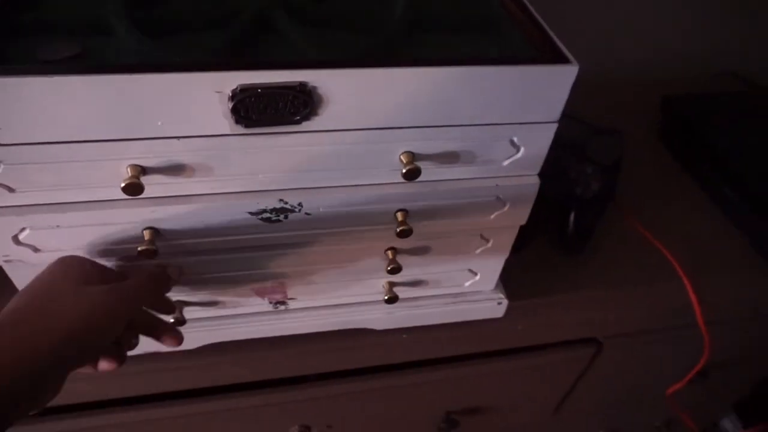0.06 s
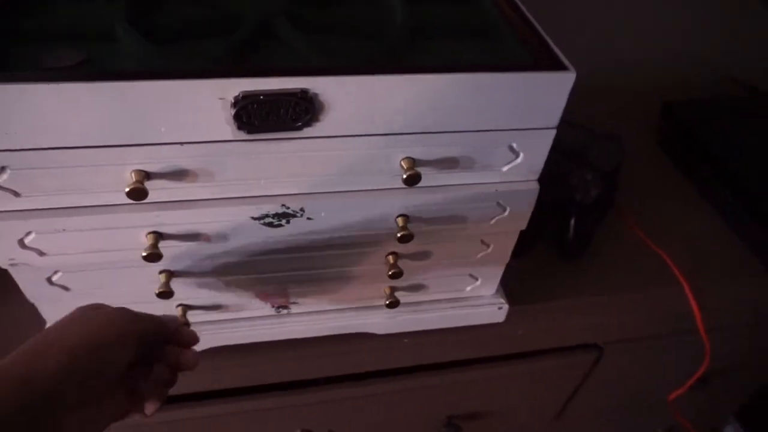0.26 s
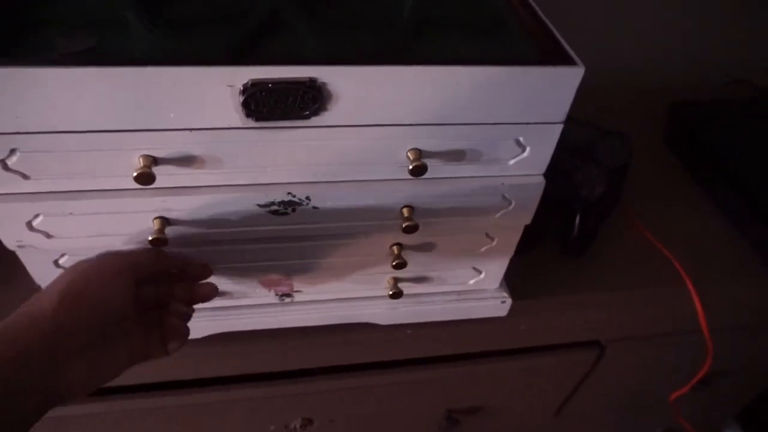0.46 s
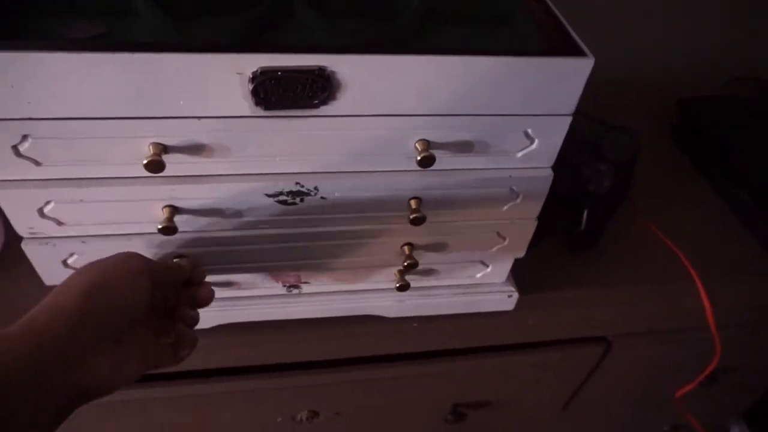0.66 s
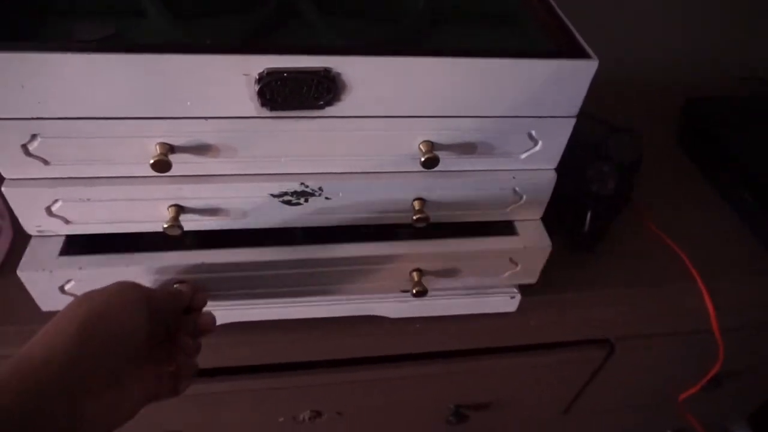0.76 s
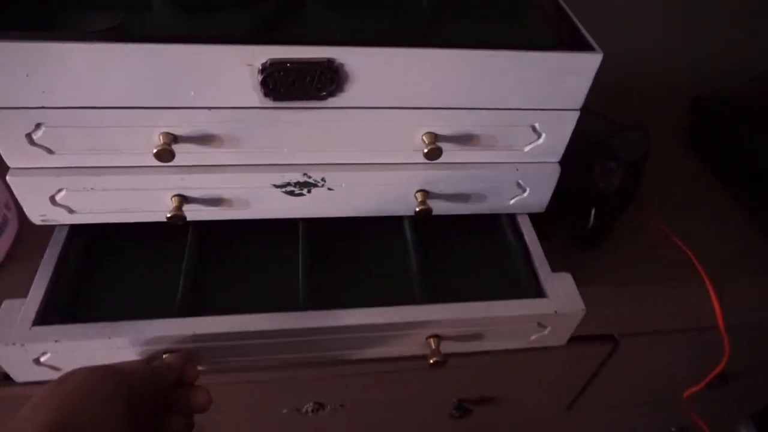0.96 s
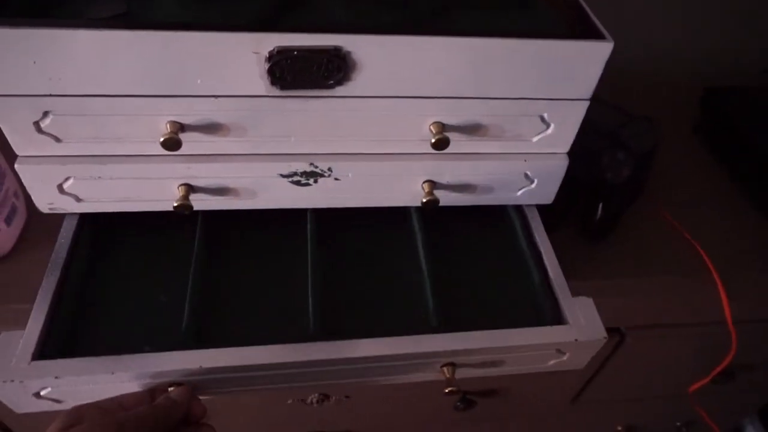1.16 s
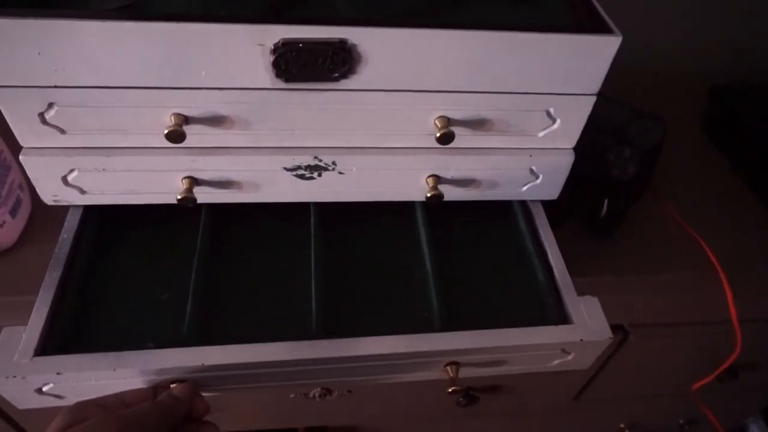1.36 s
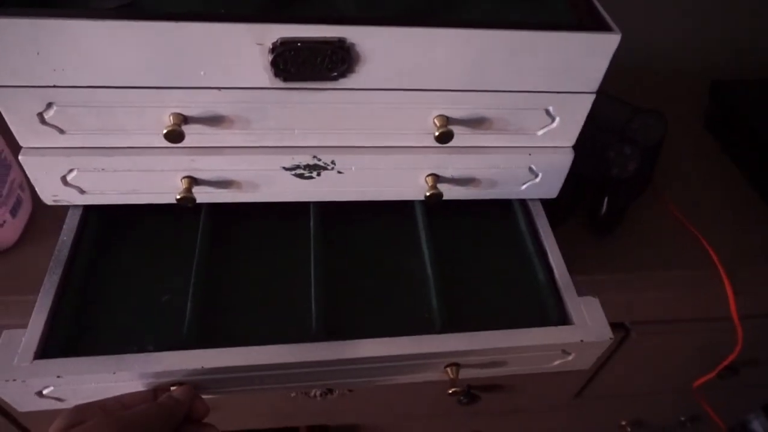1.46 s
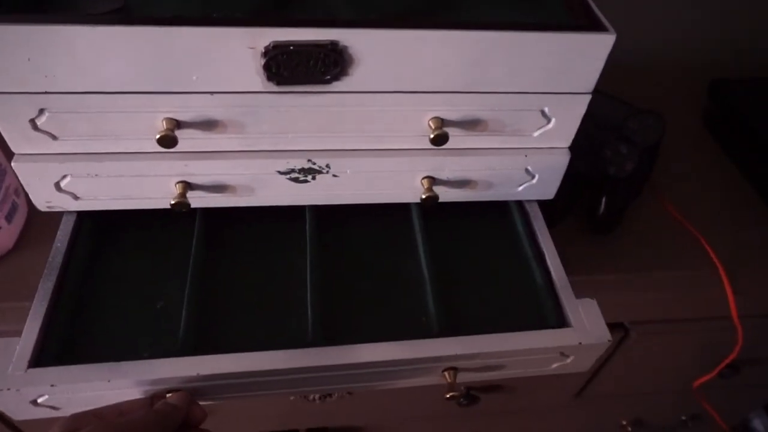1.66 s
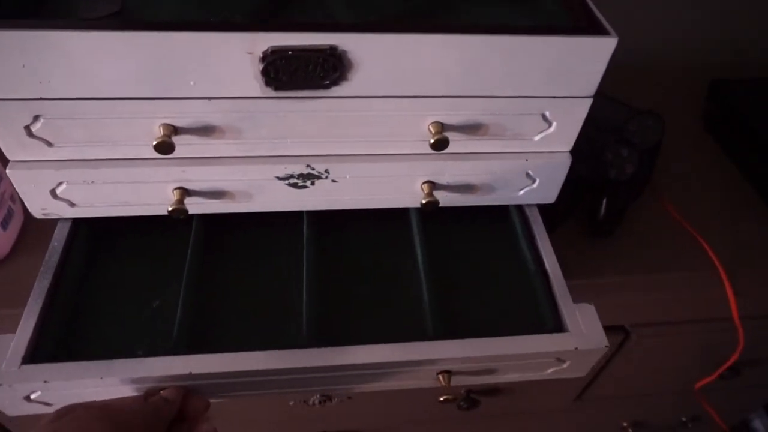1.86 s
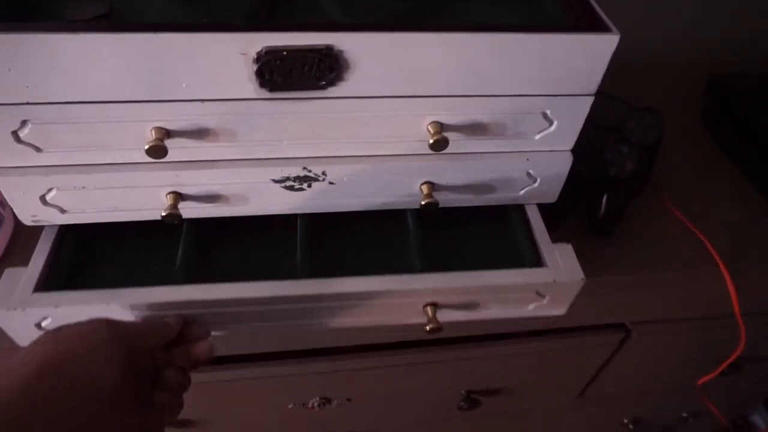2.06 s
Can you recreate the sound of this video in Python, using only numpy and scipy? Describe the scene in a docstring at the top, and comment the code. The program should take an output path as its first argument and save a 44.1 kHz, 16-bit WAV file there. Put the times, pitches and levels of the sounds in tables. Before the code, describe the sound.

A small wooden drawer, close up in a quiet, lightly echoing room. Soft bumps start it, with a quick cluster of hollow knocks around 0.25 s. A brass knob clicks at 0.56 s. A dry, grainy slide swells from 0.8 s to a strong woody knock at 0.97 s. A brief creaking catch follows near 1.18 s, then faint rubbing, near-quiet, and clacking knocks with a short scrape at 2.0-2.1 s.

```python
"""A drawer in a small wooden jewellery chest, in a quiet room. A hand bumps it home, rattles a brass
knob, pulls a drawer out and starts to push it back. Knocks and knob clicks are fading tones plus short
bursts of noise. Sliding is noise made of tiny slips, and brief catches are buzzing tones mixed with noise.
The room answers with a short tail, over faint room noise and a thin electrical whine."""
import sys
import numpy as np
from scipy import signal
from scipy.fft import rfft, irfft, next_fast_len
from scipy.io import wavfile
from scipy.ndimage import map_coordinates

SR = 44100
rng = np.random.default_rng(int(sys.argv[2]) if len(sys.argv) > 2 else 0)


def wrap_up_sound(samples):
    """Save the sound to the file named by the first command line argument, as 16-bit audio."""
    columns = np.atleast_2d(samples).T
    # keep every value between -1 and 1, then stretch to whole-number steps
    tamed = np.clip(columns, -1, 1)
    steps = np.round(tamed * 32767).astype(np.int16)
    wavfile.write(sys.argv[1], SR, steps)


N = 93227
T = np.arange(N) / SR  # time of every sample, in seconds

# All levels are relative: later gains and the sound's own colour also count.
# A t60 is the time a sound takes to fade by 60 dB.

# The drawer knocking in the case: (time [s], hollow thump level [dB], thump tilt [dB per octave],
# panel clack level [dB], contact brightness [Hz])
KNOCKS = [(.052, -31, -13, -32, 900), (0.06, -26.5, -11, -38, 890), (0.213, -33.5, -3, -31.5, 900),
          (0.2362, -24.5, 4, -20, 3960), (.246, -19.5, 10, -32, 2400), (.254, -18, 7, -31.5, 2000),
          (0.268, -23, -2, -27.5, 2400), (.767, -21, -8, -27.5, 1190), (.970, -9.5, 2, -23.5, 1200),
          (1.152, -26, 15, -56, 990), (1.259, -26.5, 4, -34.5, 900), (1.424, -33, 7, -52, 984),
          (1.968, -30, 2, -33, 900), (2.026, -24.5, -2, -16, 1550), (2.058, -15.5, -7, -20.5, 800),
          (2.096, -32, 5, -18, 1760)]
# Hollow ringing tones of the case: (pitch [Hz], level [dB], t60 [s])
CASE_MODES = [(179.2, -12.5, 0.16), (218.5, -7, 0.04), (341.8, 4.5, 0.047), (520, -8, 0.05)]
# Ringing tones of the panels: (pitch [Hz], level [dB], t60 [s])
PANEL_MODES = [(639, -4.5, 0.094), (765, 2, 0.019), (877, 1, 0.028), (1126, -8, 0.083), (1375, -1, 0.071),
               (1459, 6.5, 0.009), (1800, -9.5, 0.019), (2310, -7, 0.045)]
# Colour of the crack as wood meets wood: (pitch [Hz], level [dB])
CRACK_COLOUR = [(100, -65), (500, 3.5), (2300, 9.5), (3100, 4.5), (3700, -5.5), (8000, -10.5), (16000, -22)]
CRACK_DB, CRACK_T60_S = -4, 0.044
THUMP_RISE_S = 0.0026  # the case takes a moment to swing
THUMP_PIVOT_HZ = 313  # the tilt turns about this pitch

# The knob rattling on the drawer front: (time [s], click level [dB], thump level [dB])
KNOB_CLICKS = [(.550, -37.5, -65), (.560, -19, -26), (.567, -25.5, -27), (.583, -27, -25)]
# Ringing tones of the knob: (pitch [Hz], level [dB], t60 [s])
KNOB_MODES = [(1410, -4.5, 0.052), (1764, -4, 0.092)]
# Colour of the snap in each click: (pitch [Hz], level [dB])
SNAP_COLOUR = [(200, -10), (700, -1.5), (2900, 4), (3600, -8), (6300, -2.5), (7500, -21.5), (10000, -9),
               (16000, -40)]
SNAP_DB, SNAP_T60_S, KNOB_DB = 0.5, 0.033, -0.5
KNOB_TILT_DB = 7.5  # per octave: the knob's sharp clicks favour the upper case modes

# The drawer sliding: (time [s], hollow rumble level [dB], rasp level [dB], treble hiss level [dB])
SLIDE_LEVELS = [(0, -49, -55.5, -97), (.15, -46, -63.5, -74), (.39, -53.5, -57, -64.5),
                (.54, -55, -68, -78), (0.709, -49, -51, -60), (0.862, -35.5, -33, -41.5),
                (0.943, -35, -30, -41), (1.01, -43.5, -38, -46), (1.098, -48, -44.5, -50),
                (1.23, -37, -38.5, -54.5), (1.32, -52.5, -54, -63), (1.50, -47, -52.5, -71),
                (1.64, -63, -81, -81), (1.88, -68, -67, -92), (1.98, -42, -53, -59.5),
                (2.02, -46, -42, -50), (2.068, -32.5, -37, -45), (2.084, -29.5, -32, -44)]
# Colour of the hollow rumble: (pitch [Hz], level [dB])
RUMBLE_COLOUR = [(135, -25.5), (170, -9.5), (225, -4.5), (268, -8), (320, -0.5), (375, -0.5), (470, -9),
                 (600, -7.5), (1500, -43)]
# Colour of the wooden rasp: (pitch [Hz], level [dB])
RASP_COLOUR = [(200, -68), (630, -3.5), (790, 2.5), (1100, -3.5), (1400, 3), (1620, -7), (2000, -1.5),
               (2350, -8.5), (3900, -15.5), (8000, -33.5)]
# Colour of the treble hiss: (pitch [Hz], level [dB])
HISS_COLOUR = [(1500, -12), (3700, 2), (5600, -3), (7200, -8), (11000, -11), (16000, -30)]
# Colour of the runner's thin rub: (pitch [Hz], level [dB])
RUNNER_COLOUR = [(1300, -11), (2000, 2), (2330, -12), (2600, 6), (2950, -6.5), (6000, -33)]
# Loudness of the runner's thin rub: (time [s], level [dB])
RUNNER_LEVELS = [(.2, -72), (.45, -56.5), (.6, -79), (1.07, -42), (1.27, -48), (1.48, -46.5), (1.64, -79),
                 (1.72, -59.5), (1.82, -89)]
GRAINS_PER_S, GRAIN_SPREAD_DB = 1200, 1.45  # average number of slips, and how their sizes vary
GRAIN_SHARE = 0.45  # part of the rub's power that comes from slips
UNEVEN_DB = 1.6  # how much the grip wanders

# Dry spots on the runners: (time [s], half length [s], level [dB])
DRY_SPOTS = [(1.192, 0.059, -48.5), (2.095, 0.014, -35)]
# Colour of their sharp scrape: (pitch [Hz], level [dB])
DRY_COLOUR = [(2400, -35), (3000, -3), (4050, 2), (4500, -11), (5400, -4), (6500, -41)]

# The drawer catching and juddering: (time [s], length [s], level [dB], slip rate [Hz],
# roughness [noise amount against a tone of 1])
JUDDERS = [(1.181, 0.015, -19.5, 396, 0.36), (1.8784, 0.011, -42, 790, 0.77)]
# Colour of the judder's tone and noise: (pitch [Hz], level [dB])
JUDDER_COLOUR = [(200, -12), (390, 2), (560, -14), (790, 2.5), (1150, -11.5), (1400, 0), (1600, -12.5),
                 (12000, -58)]

# How long the room rings: (pitch [Hz], t60 [s])
ROOM_T60 = [(150, 0.58), (1000, 0.38), (7000, 0.51), (14000, 0.25)]
# Colour of the room's answer: (pitch [Hz], level [dB])
ROOM_COLOUR = [(380, -2.5), (1000, 0.5)]
ROOM_DB, ROOM_RISE_S = -3, 0.0043
JUDDER_ROOM_DB = -6.5  # the catch gets less room
WALL_S, WALL_WIDTH_S, WALL_DB = 0.018, 0.05, -4  # early echoes from nearby walls

# Colour of the faint room noise: (pitch [Hz], level [dB])
AIR_COLOUR = [(25, -2), (344, -19), (790, 1.5), (1150, -10.5), (15000, -20)]
CHEST_DB, AIR_DB = -0.5, -59.5
WHINE_HZ, WHINE_DB = 15735, -69

# How alike left and right are: (pitch [Hz], likeness [0 unrelated to 1 identical])
ALIKE = [(300, .99), (1200, 0.47), (4000, 0.26)]
# Difference between the two microphones: (pitch [Hz], left minus right [dB])
BALANCE = [(400, -2), (2000, 1.5), (12000, 0)]
TOP_HZ = 16200  # nothing is kept from here up


def amp(db):
    """Turn a level in dB into a gain."""
    return 10 ** (np.asarray(db) / 20)


def unit(x):
    """Scale a sound to an average (rms) strength of 1."""
    return x / np.sqrt(np.mean(x ** 2) + 1e-20)


def along(points, hz):
    """Read a (pitch, value) table between its points, on a log pitch axis."""
    f, v = np.transpose(points)
    return np.interp(np.log(hz + 1), np.log(f + 1), v)


def fade(t60, t=T):
    """A smooth die-away that falls 60 dB in t60 seconds."""
    return np.exp(-np.log(1000) * t / t60)


def filtered(x, response):
    """Change the strength of each pitch in x by a response to frequency."""
    m = next_fast_len(N + SR // 4)  # spare room at the end
    return irfft(rfft(x, m) * response(np.fft.rfftfreq(m, 1 / SR)), m)[..., :N]


def spread(pair, spectrum, alike):
    """Mix two unrelated signals into a left and right of the given colour and likeness."""
    def response(hz):
        turn = np.arccos(np.clip(along(alike, hz), -1, 1)) / 2
        return amp(along(spectrum, hz)) * np.array([np.cos(turn), np.sin(turn)])
    mid, side = filtered(pair, response)
    return np.array([mid + side, mid - side])


def coloured(pair, spectrum):
    """Make a stereo signal of rms 1 with the given colour."""
    return unit(spread(pair, spectrum, ALIKE))


def noise():
    """Two unrelated channels of white noise."""
    return rng.standard_normal((2, N))


def shifted(x):
    """Start a noise at a random place, so that each burst differs."""
    return np.roll(x, rng.integers(N), axis=1)


def wobble(rate):
    """A smooth random curve with the given number of knots a second."""
    return map_coordinates(rng.standard_normal(N // 20), [T * rate], mode="wrap")


def add(out, s, x):
    """Mix x in from time s."""
    i = max(0, round(s * SR))
    out[:, i:i + x.shape[-1]] += x[..., :N - i]


def ring(modes, scatter_db, soft_hz=np.inf):
    """Struck tones, a little different at each blow; a soft contact weakens the high ones."""
    t, out = T[:SR // 3], np.zeros(N)
    for k, (hz, db, t60) in enumerate(modes):
        gain = amp(db + scatter_db * rng.standard_normal()) / np.hypot(1, (hz / soft_hz) ** 2)
        sign = (-1) ** k  # every other tone starts downwards
        out[:len(t)] += sign * gain * np.sin(2 * np.pi * hz * t) * fade(t60, t)
    return out / 2


def knocks():
    """Each knock thumps the case, rings the panels and gives a short crack."""
    out, crack = np.zeros((2, N)), coloured(noise(), CRACK_COLOUR)
    for s, thump_db, tilt_db, clack_db, bright_hz in KNOCKS:
        soften = signal.butter(1, bright_hz, fs=SR)  # gentle treble cut
        burst = signal.lfilter(*soften, shifted(crack)) * fade(CRACK_T60_S)
        panels = ring(PANEL_MODES, scatter_db=3.5, soft_hz=bright_hz)
        clack = panels + amp(CRACK_DB) * burst
        add(out, s, amp(thump_db) * thump(tilt_db) + amp(clack_db) * clack)
    return out


def thump(tilt_db):
    """The hollow ring of the case; a soft push favours its lowest modes, a hard stop the upper ones."""
    modes = [(hz, db + tilt_db * np.log2(hz / THUMP_PIVOT_HZ), t60) for hz, db, t60 in CASE_MODES]
    return ring(modes, scatter_db=4.0) * (1 - np.exp(-T / THUMP_RISE_S))


def knob():
    """A quick cluster of bright clicks rings the brass knob and thumps the case."""
    out, snap = np.zeros((2, N)), coloured(noise(), SNAP_COLOUR)
    for s, click_db, thump_db in KNOB_CLICKS:
        burst = shifted(snap) * fade(SNAP_T60_S)
        click = amp(KNOB_DB) * ring(KNOB_MODES, scatter_db=3.0) + amp(SNAP_DB) * burst
        add(out, s, amp(click_db) * click + amp(thump_db) * thump(KNOB_TILT_DB))
    return out


def slide():
    """The drawer rumbles, rasps and hisses on its runners, with a thin rub and an uneven grip."""
    s, *levels = np.transpose(SLIDE_LEVELS)
    grip_db = UNEVEN_DB * wobble(70)
    out = np.zeros((2, N))
    for db, colour in zip(levels, (RUMBLE_COLOUR, RASP_COLOUR, HISS_COLOUR)):
        out += amp(np.interp(T, s, db) + grip_db) * friction(colour)
    runner_db = np.interp(T, *np.transpose(RUNNER_LEVELS))
    return out + amp(runner_db) * friction(RUNNER_COLOUR)


def friction(spectrum):
    """Tiny slips of uneven size over a smooth rub, sounding through the wood."""
    slips = rng.random(N) < GRAINS_PER_S / SR
    sizes = amp(GRAIN_SPREAD_DB * rng.standard_normal(N))
    grains = unit(slips * sizes * noise())
    mix = np.sqrt(GRAIN_SHARE) * grains + np.sqrt(1 - GRAIN_SHARE) * noise()
    return coloured(mix, spectrum)


def dry_spots():
    """Bare wood bites with a sharp scrape where the drawer presses on its runners."""
    level = sum(amp(db) * np.exp(-((T - s) / width) ** 2) for s, width, db in DRY_SPOTS)
    return level * friction(DRY_COLOUR)


def judders():
    """A few fast, rough stick-slip cycles as the drawer catches: a low tone, eight overtones and noise."""
    out, scrape = np.zeros((2, N)), coloured(noise(), JUDDER_COLOUR)
    t = T[:SR // 20]
    for s, length, db, slip_hz, rough in JUDDERS:
        hz = slip_hz * np.arange(1, 10)[:, None]
        waves = np.sin(2 * np.pi * (hz * t + rng.random(hz.shape)))
        tone = unit(np.sum(amp(along(JUDDER_COLOUR, hz)) * waves, 0))
        burst = unit(tone + rough * shifted(scrape)[:, :len(t)])
        swell = np.sin(np.pi * np.minimum(t / length, 1))  # rises, then falls to nothing
        add(out, s, amp(db) * burst * swell)
    return out


def room(x):
    """Early echoes and a diffuse tail, fading at its own speed at each pitch."""
    hz, t, z = signal.stft(noise(), SR, nperseg=256)
    decay = fade(along(ROOM_T60, hz)[:, None], t)
    tail = signal.istft(z * decay, SR)[1][:, :N]
    walls = amp(WALL_DB) * np.exp(-((T - WALL_S) / WALL_WIDTH_S) ** 2)
    build = 1 - np.exp(-T / ROOM_RISE_S) + walls
    tail = spread(unit(tail * build) / np.sqrt(N), ROOM_COLOUR, ALIKE)
    return signal.fftconvolve(x.mean(0)[None], tail[:, :SR // 2], axes=1)[:, :N]


def room_noise():
    """Steady coloured noise stands for the quiet air of the room."""
    return amp(AIR_DB) * coloured(noise(), AIR_COLOUR)


def whine():
    """A thin electrical whine: one steady, very high sine tone, stronger on the left."""
    tone = np.sqrt(2) * np.sin(2 * np.pi * WHINE_HZ * T)
    return amp(WHINE_DB) * tone * amp([[4], [-4]])  # left and right, in dB


def scene():
    """The chest, each part with its own echoes, over faint room noise and the whine."""
    parts = [(knocks(), ROOM_DB), (knob(), ROOM_DB),
             (slide() + dry_spots(), ROOM_DB), (judders(), JUDDER_ROOM_DB)]
    chest = sum(part + amp(room_db) * room(part) for part, room_db in parts)
    return amp(CHEST_DB) * chest + room_noise() + whine()


def record(dry):
    """The two microphones differ slightly, lose the deep bass and keep nothing above the band limit."""
    bass_cut = signal.butter(3, 135, "highpass", fs=SR, output="sos")

    def response(hz):
        sides = np.array([[.5], [-.5]])  # half the difference to each side
        return amp(along(BALANCE, hz) * sides) * (hz < TOP_HZ)
    return filtered(signal.sosfilt(bass_cut, dry), response)


dry = scene()
out = record(dry)
wrap_up_sound(out)
```